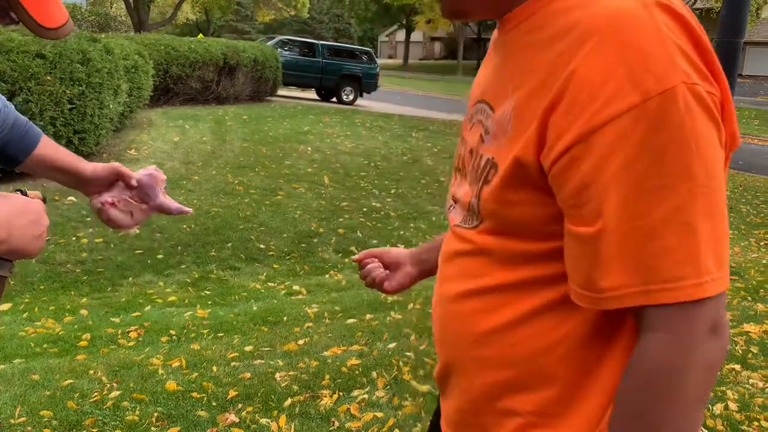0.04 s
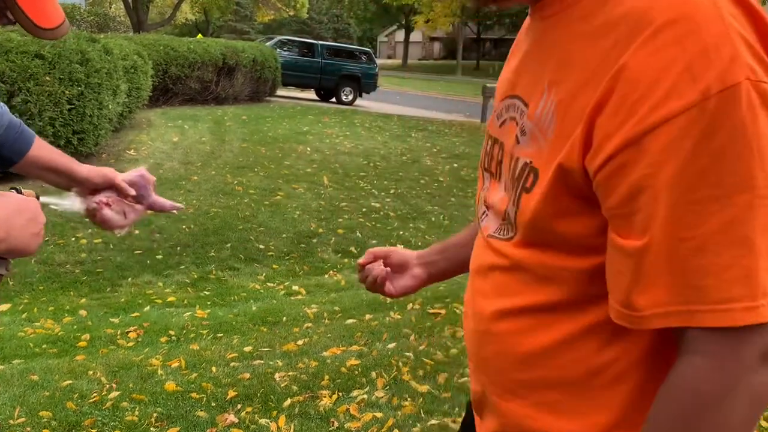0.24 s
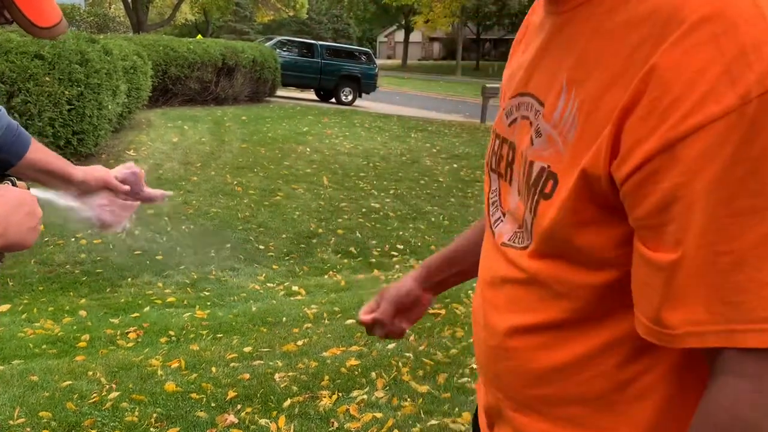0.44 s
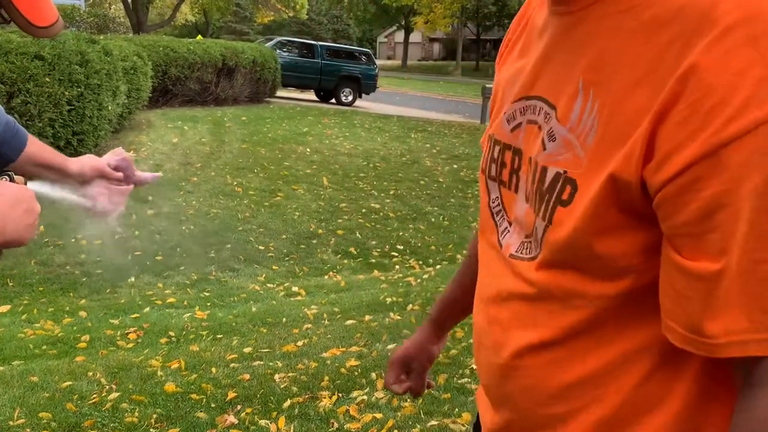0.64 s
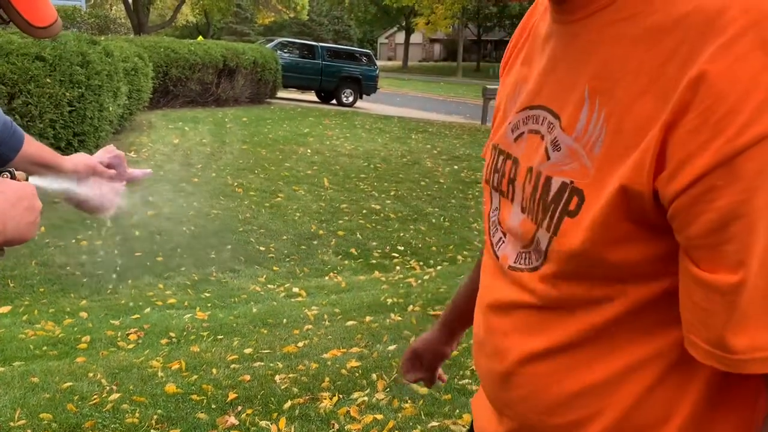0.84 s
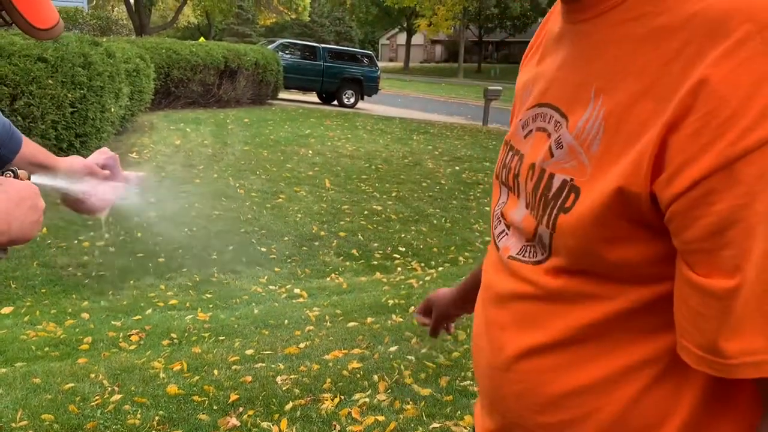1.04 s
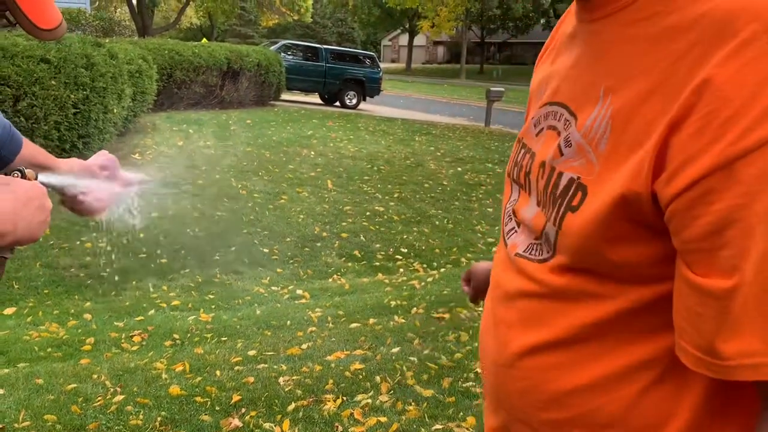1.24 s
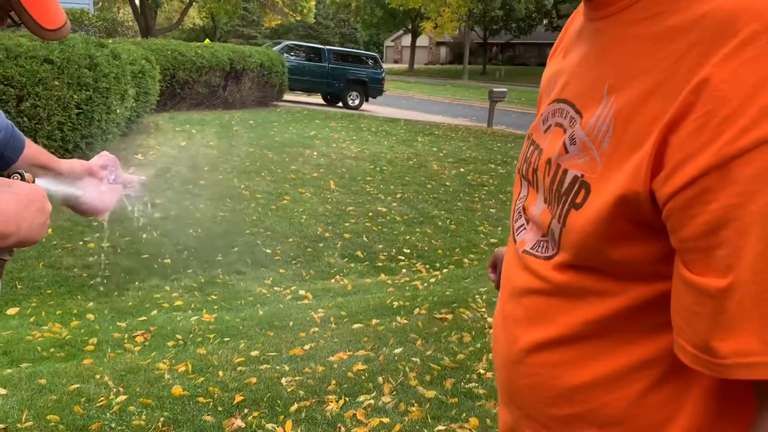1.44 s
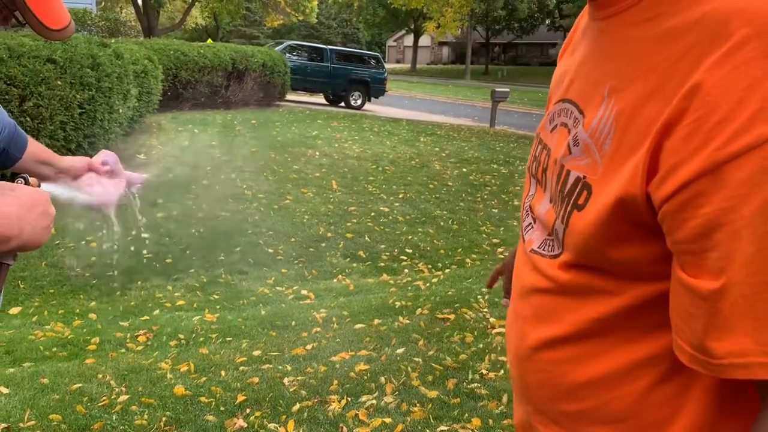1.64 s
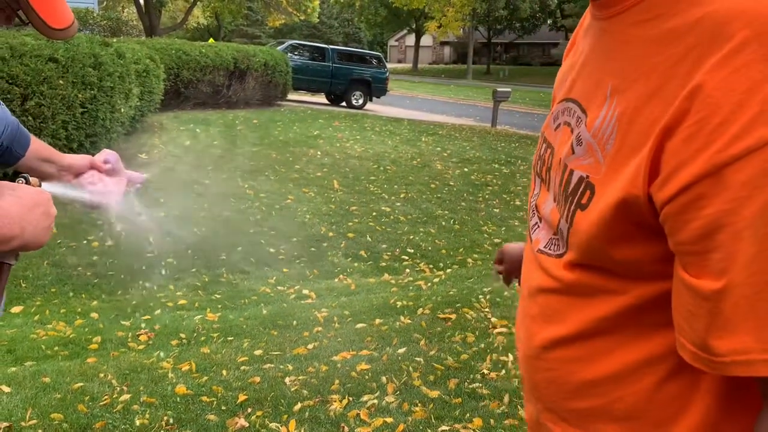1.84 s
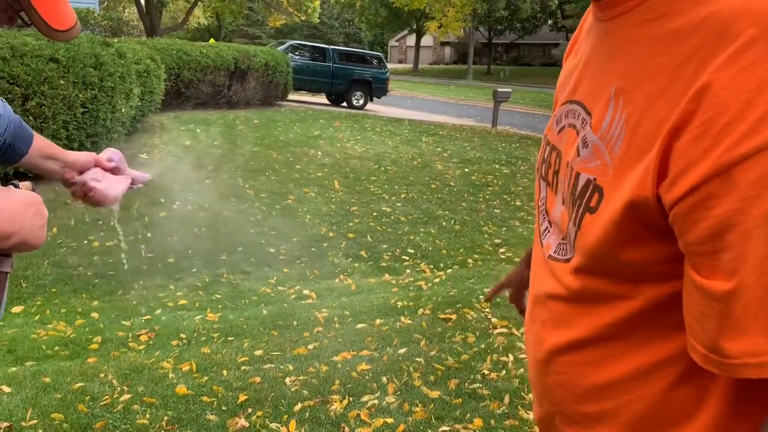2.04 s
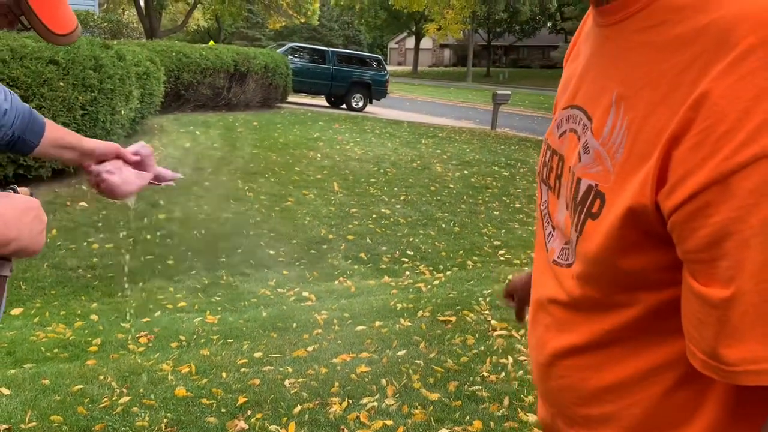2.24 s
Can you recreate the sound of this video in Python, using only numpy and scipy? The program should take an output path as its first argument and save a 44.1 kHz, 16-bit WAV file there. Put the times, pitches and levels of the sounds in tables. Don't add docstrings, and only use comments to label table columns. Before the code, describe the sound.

Short burst of hissing hose spray striking a held hand outdoors, abrupt start and quick cutoff

```python
import sys
import numpy as np
from scipy import signal
from scipy.fft import rfft, irfft, next_fast_len
from scipy.io import wavfile
from scipy.ndimage import uniform_filter1d, map_coordinates

SR = 44100
rng = np.random.default_rng(int(sys.argv[2]) if len(sys.argv) > 2 else 0)


def voltage_ratio(decibels):
    exponent = np.asarray(decibels, float) / 20
    return 10 ** exponent


def output_pcm(signal):
    pcm = np.clip(np.atleast_2d(signal).T, -1, 1) * 32767
    wavfile.write(sys.argv[1], SR, np.round(pcm).astype(np.int16))


N = 101429


def unit(x):
    return x / np.sqrt(np.mean(x ** 2) + 1e-20)


def along(points, hz):
    f, v = np.transpose(points)
    return np.interp(np.log(hz + 1), np.log(f + 1), v)


def curves(rows):
    s, *cols = np.transpose(rows)
    return [np.interp(np.arange(N) / SR, s, c) for c in cols]


def wobble(rate):
    knots = rng.standard_normal(int(N * rate / SR) + 4)
    return map_coordinates(knots, [np.arange(N) * rate / SR])


def filtered(x, response):
    m = next_fast_len(N + 8192)
    return irfft(rfft(x, m) * response(np.fft.rfftfreq(m, 1 / SR)), m)[..., :N]


def patchy(depth_db):
    z = signal.stft(rng.standard_normal((2, N)), nperseg=512)[2]
    field = uniform_filter1d(rng.standard_normal(z.shape[1:]), size=10, axis=0)
    field = uniform_filter1d(field, size=10, axis=1)
    return unit(signal.istft(z * voltage_ratio(depth_db * unit(field)), nperseg=512)[1][:, :N])


def bursts(times, levels_db, t60):
    places = np.clip((times * SR).astype(int), 0, N - 1)
    marks = np.bincount(places, voltage_ratio(levels_db), N)
    return signal.fftconvolve(marks, voltage_ratio(-60 * np.arange(2048) / SR / t60))[:N]


def swell(start, length):
    t = np.arange(N) / SR
    return np.exp(-abs((t - start) / (0.64 * length)) ** 3)


# frequency in Hz, lead of the right port in radians.
PORT_LEAD = [(0, 0), (1900, -2.3), (2300, -4.4), (3800, -6.1), (6550, -6.3), (8400, -3.14), (11050, 0),
             (15750, 6.3)]
# frequency in Hz, drift in radians.
PORT_WANDER = [(600, .1), (1800, .3), (2150, .95), (2750, .6), (3700, 1.2), (5300, 1.3), (6500, .45),
               (16000, .35)]
# start in seconds, end in seconds, centre in Hz, width in Hz, bend in radians.
REFLECTION_BENDS = [(0, 2.3, 1550, 120, .6), (0, 2.3, 1800, 110, .7), (0, 1.45, 2900, 130, 1.1),
                    (1.45, 2, 2750, 180, 1.8), (.2, .7, 3350, 90, 1.9), (.72, 1.25, 3290, 110, 2.3),
                    (1.3, 1.55, 3620, 90, 2.7), (0, 2, 4130, 130, 1.6), (.45, 2, 4850, 200, 1.2),
                    (0, 2, 5340, 150, 1.5)]


def ports(pair, alike, offset_from_hz=0, sway=1):
    hz, s, z = signal.stft(pair, SR, nperseg=512, noverlap=384)
    turn = np.arccos(np.clip(along(alike, hz), -1, 1))[:, None] / 2
    mid, side = z[0] * np.cos(turn), z[1] * np.sin(turn)
    field = rng.standard_normal(mid.shape)
    for _ in range(2):
        field = uniform_filter1d(field, size=20, axis=1)
    bend = 0
    for start, end, centre, width, size in REFLECTION_BENDS:
        bend = bend + size * np.outer(np.exp(-((hz - centre) / width) ** 2), (s > start) & (s < end))
    drift = along(PORT_WANDER, hz)[:, None] * unit(field)
    lead = np.interp(hz, *np.transpose(PORT_LEAD))[:, None] + sway * (bend + drift)
    lead = lead * (hz > offset_from_hz)[:, None]
    both = np.array([(mid + side) * np.exp(-.5j * lead), (mid - side) * np.exp(.5j * lead)])
    return signal.istft(both, SR, nperseg=512, noverlap=384)[1][:, :N]


# frequency in Hz, level in dB.
TRAFFIC_COLOUR = [(25, -20.5), (75, 1.5), (160, -14), (900, -22), (2000, -33), (6000, -42), (11000, -50),
                  (16000, -47)]
# frequency in Hz, likeness from 0 to 1.
FAR_LIKENESS = [(60, 0.86), (300, 0.7), (700, 0.035), (6000, 0.045), (8000, 0.83), (15000, 0.76)]
# time in seconds, pitch in Hz, level in dB.
ENGINE = [
    (0, 127.6, -50),
    (.4, 132.6, -52),
    (.8, 136.5, -47.5),
    (1.7, 137.7, -53),
    (1.85, 130.1, -58.5),
    (2.3, 117, -77),
]


def street():
    hz, level_db = curves(ENGINE)
    phase = 2 * np.pi * np.cumsum(hz + 1.84 * wobble(13.9)) / SR
    drone = np.sqrt(2) * voltage_ratio(level_db + 0.4 * wobble(12.9)) * np.sin(phase)
    noise = rng.standard_normal((2, N))
    rumble = voltage_ratio(-45.5) * unit(filtered(noise, lambda f: voltage_ratio(along(TRAFFIC_COLOUR, f))))
    return ports(rumble, FAR_LIKENESS, offset_from_hz=7500) + drone


OPEN_S, SHUT_S = .2012, 1.953


def valve():
    t = np.arange(N) / SR
    rise_s, shut_t60_s = 0.00082, 0.046
    return np.clip((t - OPEN_S) / rise_s, 0, 1) * voltage_ratio(-60 * np.maximum(t - SHUT_S, 0) / shut_t60_s)


# frequency in Hz, width in Hz, level in dB.
CAVITY_MODES = [
    (803, 122, 2.5),
    (1323, 120, -4.5),
    (1790, 96, 1.5),
]
# time in seconds, aim into the cavity in dB, upper resonances relative to that in dB.
JET_AIM = [(0.2, -46, -7.5), (0.248, -47.5, 0.5), (0.744, -45.5, -4), (0.814, -42.5, 2.5), (0.86, -46, 7.5),
           (1.126, -42.5, -3.5), (1.164, -49.5, -3), (1.256, -41, -4.5), (1.5, -47, -16), (1.62, -58, -21),
           (1.85, -56.5, 6), (1.896, -50, 8.5), (1.94, -56.5, -3), (1.95, -77, 11)]
# centre in seconds, length in seconds, level in dB, pitch in Hz.
CAVITY_GULPS = [(.224, 0.03, -43.5, 800), (0.311, 0.017, -39, 1790), (0.8, 0.035, -39, 817),
                (0.803, .02, -35, 1790), (.828, 0.021, -39, 1280), (.906, 0.063, -43, 840),
                (0.91, 0.026, -47, 1780), (0.971, 0.039, -42.5, 800), (0.967, 0.042, -45, 1770),
                (1.004, .025, -45, 1380), (1.017, 0.033, -37, 775), (1.094, .02, -44, 810),
                (1.113, 0.021, -33, 850), (1.224, 0.024, -36, 795), (1.264, .025, -37, 840),
                (1.332, 0.047, -36, 785), (1.335, 0.052, -42, 1320), (1.399, .03, -42.5, 885),
                (1.58, 0.025, -47, 1330), (1.874, 0.034, -39, 1330)]
# centre in seconds, length in seconds, level in dB.
SLOSHES = [
    (0.31, 0.018, -40),
    (0.83, 0.068, -38),
    (0.985, 0.04, -46),
    (1.116, 0.046, -41.5),
    (1.338, 0.035, -36),
    (1.562, 0.039, -32),
    (1.876, 0.06, -35),
]
# frequency in Hz, level in dB.
SLOSH_COLOUR = [(900, -17), (1350, 2), (1800, -5.5), (2300, -27), (4500, 6.5), (7000, -10)]
# time in seconds, level in dB.
HAND_KNOCKS = [
    (0.358, -44.5),
    (1.17, -47.5),
    (1.338, -46.5),
]


def resonate(modes):
    def response(f):
        total = 0
        for k, (centre, width, db) in enumerate(modes):
            band = 1j * f * width / (centre * centre - f * f + 1j * f * width)
            total = total + (-1) ** k * voltage_ratio(db) * band
        return total
    return unit(filtered(patchy(depth_db=0.5), response))


def cavity():
    t = np.arange(N) / SR
    aim_db, upper_db = curves(JET_AIM)
    low = voltage_ratio(aim_db - 1.0 + 1.5 * wobble(34.65)) * valve()
    upper = voltage_ratio(aim_db + upper_db - 1.0 + 1.0 * wobble(29.1)) * valve()
    hum = low * resonate(CAVITY_MODES[:1]) + upper * resonate(CAVITY_MODES[1:])

    waver = np.cumsum(35 * wobble(60)) / SR
    gulps = sum(voltage_ratio(db) * swell(s, length) * np.sin(2 * np.pi * (hz * t + waver))
                for s, length, db, hz in CAVITY_GULPS)
    gulps = gulps * voltage_ratio(2.9 * wobble(90))

    bright = sum(voltage_ratio(db) * swell(s, length) for s, length, db in SLOSHES) * voltage_ratio(1.84 * wobble(120))
    colour = [(400, -68)] + SLOSH_COLOUR + [(12000, -55)]
    splash = unit(filtered(patchy(depth_db=5.0), lambda hz: voltage_ratio(along(colour, hz))))

    knock = sum(voltage_ratio(db) * swell(s, 0.023) for s, db in HAND_KNOCKS) * resonate([(297, 250, 0)])
    return 1.35 * (hum + bright * splash + knock + gulps * [[1], [0]])


# frequency in Hz, level in dB.
SPRAY_COLOUR = [(300, -34), (2200, -13.5), (4000, -11.5), (6500, -5.5), (9800, 1), (12500, -2), (15600, -2),
                (16500, -9.5)]


def nozzle_colour(hz, share=1):
    return voltage_ratio(share * along(SPRAY_COLOUR, hz))


# time in seconds, peak level in dB.
NOZZLE_SPITS = [(0.2018, -7), (0.2036, -18), (0.2058, -12), (0.2083, -12), (0.211, -11), (0.2168, -16),
                (0.2187, -11), (0.2221, -17), (0.2251, -13), (0.2269, -17), (0.2289, -15), (0.2319, -15),
                (0.2339, -15), (0.2399, -16), (0.2418, -18), (0.2437, -20), (0.2458, -16), (0.2478, -19),
                (0.2502, -20), (0.2536, -15), (0.2553, -21), (0.2577, -19), (0.5951, -11), (0.7382, -12),
                (0.8246, -14), (0.8956, -12), (0.9257, -14), (0.9419, -13), (0.9739, -8), (1.0429, -13),
                (1.0676, -13), (1.1102, -15), (1.1479, -19), (1.1566, -19), (1.215, -15), (1.279, -15),
                (1.3738, -13), (1.3771, -13), (1.396, -11), (1.4435, -13), (1.5155, -11), (1.5363, -12),
                (1.6528, -11), (1.6712, -14), (1.6756, -14), (1.6798, -10), (1.7328, -12), (1.7566, -13),
                (1.7766, -10), (1.8372, -11), (1.8505, -11), (1.8997, -14), (1.9347, -15), (1.9389, -14),
                (1.9461, -16), (1.9544, -18)]


def slugs():
    places = [round(s * SR) for s, _ in NOZZLE_SPITS]
    clicks = np.bincount(places, voltage_ratio([db + 7 for _, db in NOZZLE_SPITS]), N)
    signs = np.sign(rng.standard_normal(N))
    return filtered(clicks * signs * [[1], [0]], lambda hz: nozzle_colour(hz, .55))


# time in seconds, force in dB.
JET_FORCE = [(0.205, -25.5), (0.24, -25), (0.281, -30), (0.315, -24.5), (0.741, -22.5), (0.769, -26.5),
             (0.963, -23.5), (1.097, -25), (1.137, -30.5), (1.363, -27), (1.377, -24), (1.421, -25.5),
             (1.779, -24.5), (1.807, -28.5), (1.851, -23), (1.923, -27.5), (1.94, -30)]
# time in seconds, level in dB.
FALLING_DROPS = [
    (0.106, -50),
    (.16, -51),
    (2.019, -54),
    (2.028, -45),
    (2.071, -67),
    (2.189, -52),
    (2.22, -52),
    (2.29, -55),
]


def spray():
    t = np.arange(N) / SR
    force_db, = curves(JET_FORCE)
    flow = valve() * voltage_ratio(force_db + 1.16 * wobble(25.4) + 0.28 * wobble(180))

    leak_s, leak_db, sag_db, fall_s = .154, -47, 4, .02
    leak_level = leak_db + sag_db * (1 + np.exp(-abs(t - leak_s) / fall_s))
    leak = (t > leak_s) * (t < OPEN_S + .002) * voltage_ratio(leak_level)

    mist_db, mist_t60_s = -55.5, 1
    mist = (t > SHUT_S) * voltage_ratio(mist_db - 60 * abs(t - SHUT_S) / mist_t60_s + 4.3 * wobble(45.01))

    drops_per_s, drop_s, spread_db = 700, .0004, 2.4
    draws = rng.random((round(drops_per_s * N / SR), 2))
    drop_db = -spread_db * np.log(draws[:, 1] + .07)
    drops = unit(bursts(draws[:, 0] * N / SR, drop_db, 7 * drop_s))
    drips = bursts(*np.transpose(FALLING_DROPS), 0.0055)

    hiss = (flow + mist) * voltage_ratio(.5) * patchy(depth_db=-0.02)
    hits = flow * voltage_ratio(-1.5) * drops * rng.standard_normal((2, N))
    dribble = filtered((leak + drips) * patchy(depth_db=8.5), lambda hz: nozzle_colour(hz, 0.35))
    colour_rms = np.sqrt(np.mean(nozzle_colour(np.linspace(0, SR / 2, 999)) ** 2))
    return 1.54 * dribble + filtered(hiss + hits, nozzle_colour) / colour_rms


# frequency in Hz, likeness from 0 to 1.
NEAR_LIKENESS = [(300, .85), (850, .95), (1900, .92), (2600, .86), (5200, .86), (6400, .93), (9500, .87),
                 (16000, .85)]


def scene():
    jet = ports(spray() + cavity(), NEAR_LIKENESS)
    spits = ports(slugs(), NEAR_LIKENESS, sway=0)
    return jet + spits + street()


def band_limit(x):
    top_hz = 15700

    def edge(hz):
        skirt = voltage_ratio(-34 - (np.maximum(hz - top_hz, 0) / 135) ** 2)
        return (1 - np.tanh((hz - top_hz) / 22)) / 2 + skirt
    return filtered(x, edge)


STEREO_EDGES = np.r_[88:176:4, 176:264:11, 264, 292, 320:769:32]


def joint(x):
    limit_db, jitter_db, shift = -5.2, 1.8, 809
    how = dict(window="cosine", nperseg=2048, noverlap=1024)
    sum_diff = np.pad([x[0] + x[1], x[0] - x[1]], ((0, 0), (shift, 0)))
    z = signal.stft(sum_diff, **how)[2]
    band = np.searchsorted(STEREO_EDGES, np.arange(z.shape[1]), "right")
    power = np.add.reduceat(abs(z) ** 2, np.r_[0, STEREO_EDGES], axis=1)
    power = uniform_filter1d(power, size=2, axis=2)
    limit = voltage_ratio(2 * (limit_db + jitter_db * rng.standard_normal(power.shape[1:])))
    keep = (power > limit * power[::-1])[:, band] | (band == 0)[:, None]
    mid, side = signal.istft(z * keep, **how)[1][:, shift:shift + N] / 2
    return np.array([mid + side, mid - side])


def roll_off(x):
    return signal.sosfilt(signal.butter(12, 17060, fs=SR, output="sos"), x)


def record(dry):
    mix = joint(band_limit(dry))
    return roll_off(mix)


dry = scene()
out = record(dry)
output_pcm(out)
```